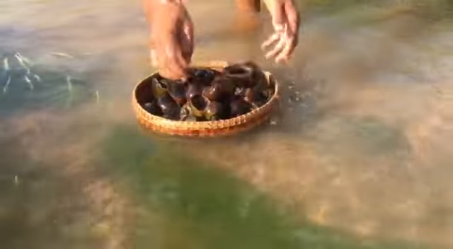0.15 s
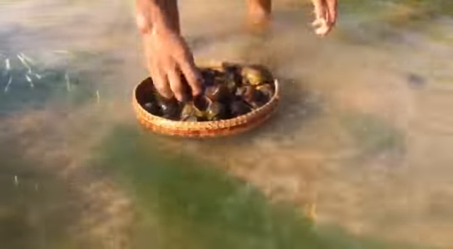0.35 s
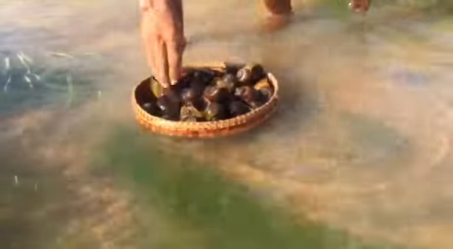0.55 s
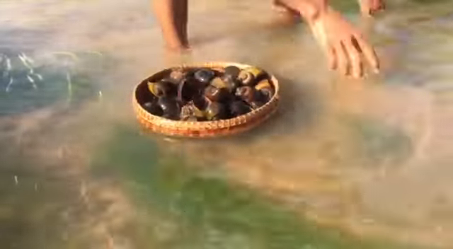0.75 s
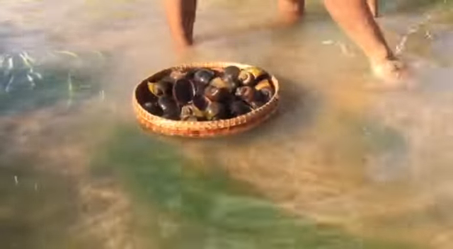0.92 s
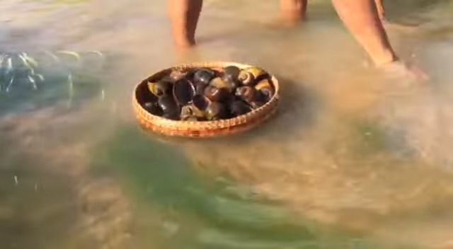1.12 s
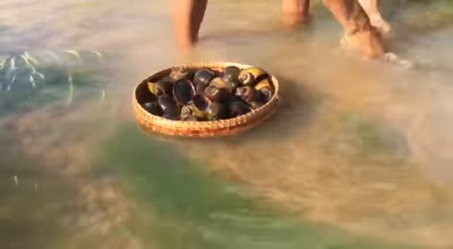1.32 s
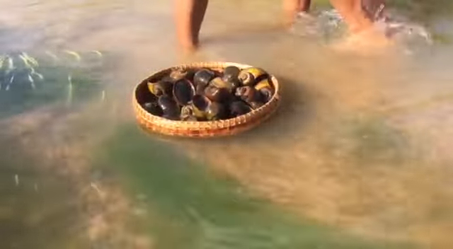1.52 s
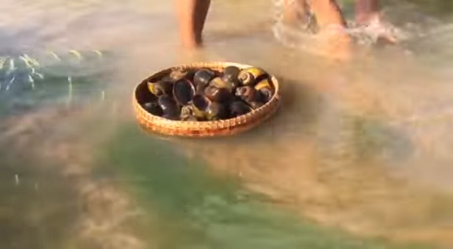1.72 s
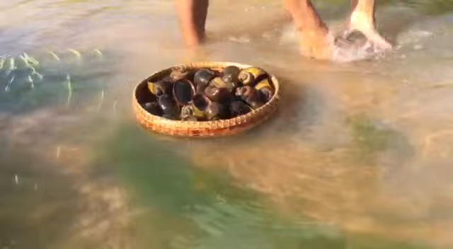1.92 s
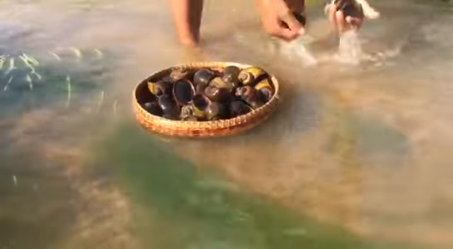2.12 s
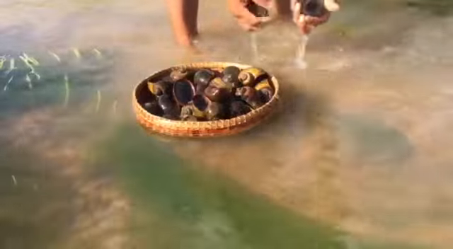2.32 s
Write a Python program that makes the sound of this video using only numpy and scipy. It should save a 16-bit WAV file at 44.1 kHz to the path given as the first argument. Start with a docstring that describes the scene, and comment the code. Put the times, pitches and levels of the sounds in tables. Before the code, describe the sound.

Hard shells knock and grind together briefly, followed by a hand dipping and sloshing through shallow water

```python
"""Snails rinsed in a shallow stream, over a low rumble, a wavering hum and a faint trickle.
First water dribbles off, then wet shells knock in a woven basket: short damped rings that rattle the heap,
with the gritty grinding of fingers shifting it. Next a hand dips in, then swishes a handful about: gliding
bubble rings, noise-burst slaps, and clouds of tiny rings for gurgle, slosh and spray. It ends in drips."""
import sys
import numpy as np
from scipy import signal
from scipy.fft import rfft, irfft
from scipy.io import wavfile

SR = 44100
rng = np.random.default_rng(int(sys.argv[2]) if len(sys.argv) > 2 else 0)


def dump(signal):
    """Clip the signal to [-1, 1] and save it as 16-bit WAV at the path in sys.argv[1]."""
    limited = np.clip(np.atleast_2d(signal).T, -1, 1)
    pcm = np.round(limited * 32767).astype(np.int16)
    wavfile.write(sys.argv[1], SR, pcm)


N = 103635  # length in samples

# Colour of the low rumble. Each row: frequency in Hz, level in dB per Hz.
RUMBLE_COLOUR = [(35, -31), (50, -12.5), (65, -4), (130, -4), (200, -20.5)]
# Colour of the stream's trickle. Each row: frequency in Hz, level in dB.
TRICKLE_COLOUR = [(150, 24), (300, 3.5), (600, -8), (2200, -10), (6000, 6.5), (9000, 0)]
# Colour of the echo from the banks. Each row: frequency in Hz, level in dB.
BANK_COLOUR = [(200, -9), (900, -2.5), (4000, -10)]
# Treble response of the microphone. Each row: frequency in Hz, gain in dB.
MIC_COLOUR = [(3000, -0.5), (4200, -1), (4900, -4.5), (5500, -1), (6500, -2), (7300, -3), (8200, 1),
              (8900, 2), (9500, -13.5)]
# Water running off the hand. Each row: time in seconds, level in dB.
DRIBBLE_CURVE = [(0, -44), (.055, -52.5), (.075, -62.5), (.135, -74), (.15, -55), (.195, -45),
                 (.215, -63.5), (.26, -74)]
# Colour of the dribble's bubbles. Each row: frequency in Hz, level in dB.
DRIBBLE_COLOUR = [(1100, -13.5), (2200, 2), (4800, -6.5), (9500, -13.5)]
# Single drops smacking the surface. Each row: start in seconds, level in dB.
DROPS = [(.143, -39.5), (.757, -41.5), (0.82, -36.5), (0.858, -30), (1.019, -35.5), (1.556, -25),
         (1.572, -30.5), (1.5977, -22), (1.669, -35), (1.727, -30), (1.7626, -27), (1.849, -21),
         (1.921, -24), (1.938, -26), (2.0491, -23.5), (2.11, -36.5), (2.139, -36), (2.173, -38),
         (2.217, -37), (2.238, -33.5), (2.274, -50.5), (2.3356, -35)]
# Colour of a drop's smack. Each row: frequency in Hz, level in dB.
DROP_COLOUR = [(1000, -13), (3000, 2.5), (5500, -3.5), (9000, -3)]
# Slaps of the hand and of falling water. Each row: start in seconds, level in dB, decay time in seconds.
SLAPS = [(0.875, -30.5, 0.043), (1.703, -29, 0.11), (1.7597, -15, 0.025), (1.8396, -25, 0.076),
         (1.9351, -28, 0.043), (2.065, -26, 0.022), (2.084, -26, 0.023)]
# Colour of a slap. Each row: frequency in Hz, level in dB.
SLAP_COLOUR = [(400, -17.5), (1600, -3), (4200, -7.5), (6500, -10), (9500, -25.5)]
# Large bubbles and drips. Each row: start in seconds, starting pitch in Hz, level in dB,
# ring time in seconds, pitch glide in octaves per second.
BUBBLES = [(.008,2050,-30.5,0.017,9), (.045,2030,-34,.014,10), (.176,1890,-43,0.031,25), (.6,597,-45,0.3,1),
           (.689,754,-39.5,0.072,8.5), (.77,1170,-30.5,0.033,0), (.795,854,-34.5,0.073,17.5),
           (.818,4130,-37,0.021,12), (.845,760,-44,0.083,1), (.877,2440,-24,0.017,-12),
           (.884,433,-27,0.039,-4.5), (.914,2050,-23.5,.022,7), (.923,820,-27,0.066,5.5),
           (0.928,3000,-27,0.02,14), (.939,3770,-23,.018,8), (.956,1444,-28,0.036,5.5),
           (.976,3900,-28,.011,2), (.998,578,-34,0.1,0.5), (1.027,3340,-23,0.0088,-20),
           (1.074,1953,-33.5,0.04,7), (1.249,860,-46.5,0.078,13.5), (1.319,1424,-33.5,0.042,14.5),
           (1.315,847,-49,0.15,4.5), (1.45,1080,-33.5,0.03,-4), (1.517,642,-37.5,.11,-3),
           (1.539,1490,-30,0.049,13), (1.557,936,-30.5,0.038,16), (1.576,982,-29,0.05,19),
           (1.6216,695,-15,0.043,37), (1.6872,950,-20.5,0.065,15.5), (1.7046,1125,-14.5,0.022,26),
           (1.705,1960,-21,0.017,20), (1.767,1805,-17,0.02,13), (1.835,2500,-22,.039,-3),
           (1.844,1376,-21.5,0.019,11), (1.848,450,-24,0.043,26), (1.926,2010,-24.5,0.031,-13),
           (1.939,2550,-23.5,0.027,16), (1.9525,828,-7.5,.014,-12), (1.964,764,-24.5,0.029,23),
           (1.974,1470,-23,0.038,22), (2.005,1020,-19.5,0.017,27), (2.045,1060,-20,0.017,11),
           (2.066,1050,-28,0.024,20), (2.121,930,-31.5,0.024,23), (2.147,1470,-30,0.022,25),
           (2.163,780,-29,0.019,39), (2.276,1210,-42.5,0.045,12), (2.29,2280,-34,.016,15),
           (2.306,994,-31.5,0.042,4.5), (2.335,1136,-32.5,.031,13)]
# The hand dipping in. Each row: time in seconds, slosh level in dB, spray level in dB.
DIP = [(.74, -81, -74), (.861, -67, -60), (0.912, -46, -30), (.933, -39.5, -36), (.954, -39, -50),
       (1.0, -53, -59), (1.04, -47, -52.5), (1.125, -70, -68.5), (1.3, -69.5, -99)]
# The hand swishing. Each row: time in seconds, slosh level in dB, spray level in dB.
SWISH = [(1.41, -58, -71), (1.48, -50, -59.5), (1.526, -55.5, -60.5), (1.555, -37, -50.5),
         (1.597, -40, -43.5), (1.655, -44, -44.5), (1.687, -30.5, -42.5), (1.73, -41.5, -44.5),
         (1.773, -33.5, -41.5), (1.815, -42, -44), (1.845, -36, -36.5), (1.9, -42.5, -43),
         (1.965, -34, -41.5), (2.031, -42, -47), (2.069, -38, -46), (2.135, -42, -44.5),
         (2.265, -59.5, -52.5), (2.35, -50.5, -60)]
# Gurgle following the depth of the hand's push. Each row: time in seconds, level in dB.
CHURN = [(.86, -82), (.89, -49), (1.07, -57), (1.12, -74.5), (1.56, -72.5), (1.77, -38.5), (1.81, -54.5),
         (1.85, -44), (1.95, -66.5), (2.11, -64.5), (2.15, -84)]
# Colour of the low gurgle. Each row: frequency in Hz, level in dB.
GURGLE_COLOUR = [(220, -20), (330, -1.5), (420, -3.5), (600, -1)]
# Colour of the slosh, bubble size by pitch. Each row: frequency in Hz, level in dB.
SLOSH_COLOUR = [(480, -25), (620, -2.5), (1200, 4), (4000, -9)]
# Colour of the fine spray. Each row: frequency in Hz, level in dB.
SPRAY_COLOUR = [(1200, -19.5), (2300, -1.5), (4000, -2.5), (6000, -3.5), (10000, -10.5)]
# Colour of flung droplets landing. Each row: frequency in Hz, level in dB.
SPATTER_COLOUR = [(1500, -6.5), (3000, -4.5), (6000, -7), (9500, -6)]
# Fingers shifting the heap. Each row: time in seconds, level in dB.
RUMMAGE_CURVE = [(.24, -64), (.255, -45), (.34, -56), (.375, -62), (.395, -33.5), (.47, -65), (.505, -51.5),
                 (.625, -43), (.73, -63), (.77, -45.5), (.86, -83)]
# Colour of the tiny shell contacts. Each row: frequency in Hz, level in dB.
GRIT_COLOUR = [(200, -6), (2800, 1.5), (5000, -14.5), (6200, -11.5), (9500, -13.5)]
# Shell knocks. Each row: start in seconds, shell pitch in Hz, ring level in dB, contact tick level in dB,
# ring time in seconds, pitch of the shell's hollow in Hz, hollow level in dB.
KNOCKS = [(.2236, 1610, -7.5, -14.5, 0.0055, 6080, -20.5), (.2397, 1700, -14.5, -24, 0.0099, 2760, -34),
          (.2425, 1100, -1, -38, 0.0049, 1750, -30), (.2450, 2140, -3.5, -31.5, 0.0059, 2776, -25.5),
          (0.25, 1250, -19, -59, .0073, 1010, -33), (.2565, 2080, -21, -46, 0.0063, 1460, -28),
          (0.2597, 1130, -20, -49, .008, 2010, -33), (.2985, 1240, 0.5, -29.5, 0.0028, 1520, -22),
          (0.3135, 1430, -18.5, -52, 0.005, 2270, -28), (0.3778, 3030, -48, -33, 0.0094, 6020, -45),
          (.3910, 860, -24.5, -30, 0.0057, 2760, -29.5), (.4089, 1220, -20.5, -30.5, 0.0088, 2250, -26),
          (0.4441, 1000, -25.5, -41.5, 0.0048, 2440, -42), (0.491, 1200, -6.5, -37.5, 0.0052, 1870, -24.5),
          (0.5255, 890, -18, -58, 0.003, 1150, -34), (0.54, 1380, -21.5, -49, 0.0066, 2620, -37),
          (0.5704, 1140, -25, -60, 0.007, 1700, -31), (0.5925, 1450, -16, -47, 0.0039, 1060, -41),
          (.6060, 1610, -17, -45, 0.0042, 2840, -35), (0.6204, 2360, -23, -35, 0.0042, 3740, -28),
          (0.631, 2590, -13.5, -29.5, 0.0044, 2474, -15.5), (.6875, 1050, -26.5, -49, 0.0037, 2630, -42),
          (.764, 2260, -20, -37.5, .0057, 2710, -37), (1.0625, 1430, -20.5, -39, 0.003, 1780, -39)]
# Partials of the shell wall. Each row: ratio to the pitch, level in dB, share of the ring time as a ratio.
SHELL_PARTIALS = [(0.619, -7.5, 0.81), (1.0, 6, 0.62), (1.519, -13, 0.79)]
# Colour of the contact tick. Each row: frequency in Hz, level in dB.
TICK_COLOUR = [(300, 12.5), (1500, 5), (3000, 2.5), (4500, -1), (6000, 5), (7200, -2.5), (8500, -3.5),
               (10000, 2.5)]
# Colour of the rattle of heap and basket. Each row: frequency in Hz, level in dB.
HEAP_COLOUR = [(150, -8), (300, -1), (650, -1), (1100, -3), (4000, 0.5), (6000, -4.5)]


def undb(db):
    """Decibels to gain."""
    return 10 ** (np.asarray(db) / 20)


def unit(x):
    """Scale to rms 1."""
    return x / np.sqrt(np.mean(x ** 2))


def add(out, start, x):
    """Mix x into out from a time in seconds."""
    i = max(int(start * SR), 0)
    out[i:i + len(x)] += x[:max(len(out) - i, 0)]


def gain_at(points, hz):
    """Gain of (Hz, dB) points on a log-frequency axis."""
    f, db = np.array(points, float).T
    return undb(np.interp(np.log(np.maximum(hz, 1)), np.log(f), db))


def noise(points):
    """Noise of rms 1 with the given colour."""
    spectrum = rfft(rng.standard_normal(N))
    return unit(irfft(spectrum * gain_at(points, np.fft.rfftfreq(N, 1 / SR)), N))


def swell(curve):
    """Gain over time from (s, dB) points."""
    s, db = np.array(curve).T
    return undb(np.interp(np.arange(N) / SR, s, db))


def butter(x, order, hz, kind):
    """Butterworth filter, kind "low" or "high"."""
    return signal.sosfilt(signal.butter(order, hz, kind, fs=SR, output="sos"), x)


def fade(t60, hold=1):
    """Decay to -60 dB in t60 seconds; exponential at hold 1, above it the level holds, then dies faster."""
    t = np.arange(min(int(t60 * SR) + 2, N)) / SR
    return np.exp(-np.log(1000) * (t / t60) ** hold)


def ring(hz, t60, onset, rise=0, hold=1):
    """A damped sine that swells over the onset time and glides by rise octaves per second."""
    env = fade(t60, hold)
    t = np.arange(len(env)) / SR
    phase = 2 * np.pi * np.cumsum(hz * 2 ** (rise * t)) / SR
    attack = 1 - np.exp(-(t / onset) ** 2)
    return np.sin(phase) * env * attack


def scatter(x, source, t60):
    """Smear x with a decaying noise tail of unit energy."""
    env = fade(t60)
    tail = source[:len(env)] * env
    return signal.fftconvolve(x, tail / np.linalg.norm(tail))[:N]


def tint(x, points):
    """Colour x by (Hz, dB) points, causally (minimum phase)."""
    cepstrum = irfft(np.log(gain_at(points, np.fft.rfftfreq(1024, 1 / SR))))
    folded = np.r_[cepstrum[0], 2 * cepstrum[1:len(cepstrum) // 2]]
    impulse = irfft(np.exp(rfft(folded, len(cepstrum))))
    return signal.fftconvolve(x, impulse)[:N]


def cloud(colour, per_s, cycles, spread_db, rise_oct):
    """A steady stream of tiny rings of random pitch, level and length, each gliding rise_oct octaves; rms 1."""
    out = np.zeros(N)
    lo, hi = colour[0][0], colour[-1][0]
    draws = rng.random((12000, 4))
    for k, (when, pitch, size, length) in enumerate(draws[:int(per_s * N / SR)]):
        hz = lo * (hi / lo) ** pitch
        t60 = cycles * (.5 + length) / hz
        # mostly small grains, with a capped tail of louder ones
        db = spread_db * min(-np.log(1 - size), np.pi)
        level = undb(db) * gain_at(colour, hz) * np.sqrt(hz / hi)
        add(out, (k + when) / per_s, level * ring(hz, t60, .5 / hz, rise_oct / t60))
    return unit(butter(out, 4, lo, "high"))


def background():
    """Low-passed noise as rumble, a sine hum of wavering level, and coloured noise as the stream's trickle."""
    t = np.arange(N) / SR
    rumble = unit(butter(noise(RUMBLE_COLOUR), 4, 185.6, "low"))
    waver = noise([(3, 0), (30, -60), (300, -140)])  # slow: mostly a few Hz
    hum = np.sin(2 * np.pi * 117 * t) * (1 + 0.13 * waver)
    return undb(-47.5) * rumble + undb(-56) * hum + undb(-66) * noise(TRICKLE_COLOUR)


def dribble():
    """Water runs off the handful onto the wet heap in tiny high bubbles."""
    return swell(DRIBBLE_CURVE) * cloud(DRIBBLE_COLOUR, per_s=1200, cycles=32, spread_db=0, rise_oct=0.14)


def drops():
    """Falling drops give brief bright smacks."""
    out, smack = np.zeros(N), noise(DROP_COLOUR)
    env = fade(0.0082)
    for s, db in DROPS:
        burst = np.roll(smack, -int(s * SR))[:len(env)]
        add(out, s, undb(db) * env * burst)
    return out


def slaps():
    """Water hit flat gives a short broad burst."""
    out, burst = np.zeros(N), noise(SLAP_COLOUR)
    onset_s = 0.0011
    for s, db, t60 in SLAPS:
        env = fade(t60)
        attack = 1 - np.exp(-np.arange(len(env)) / SR / onset_s)
        add(out, s, undb(db) * env * attack * burst[int(s * SR):][:len(env)])
    return out


def bubbles():
    """Large air pockets ring, most of them rising in pitch as they near the surface."""
    out = np.zeros(N)
    onset_cycles = 1.79
    for s, hz, db, t60, rise in BUBBLES:
        add(out, s, undb(db) * ring(hz, t60, onset_cycles / hz, rise, hold=1.05))
    return out


def spurts():
    """The water breaks up in short uneven spurts: a gain that wanders quickly at random."""
    knots = rng.standard_normal(2000)
    position = np.arange(N) / SR * 130  # knots per second
    return undb(3 * np.interp(position, np.arange(len(knots)), knots))


def stirred_water():
    """The hand drives a low gurgle, a slosh of mid-sized bubbles, fine spray and a sparse spatter of droplets."""
    stir = np.array(DIP + SWISH)
    gurgle = cloud(GURGLE_COLOUR, per_s=350, cycles=18, spread_db=3.5, rise_oct=0.48)
    slosh = cloud(SLOSH_COLOUR, per_s=900, cycles=26.4, spread_db=4.5, rise_oct=0.49)
    spray = cloud(SPRAY_COLOUR, per_s=2600, cycles=16, spread_db=1, rise_oct=0.1)
    spatter = cloud(SPATTER_COLOUR, per_s=170, cycles=7, spread_db=5, rise_oct=0)
    droplets = unit(spray + undb(-7) * spatter)
    broken = slosh * swell(stir[:, [0, 1]]) + droplets * swell(stir[:, [0, 2]])
    return gurgle * swell(CHURN) + spurts() * broken


def rummage():
    """Shells grind on each other in many tiny dry contacts."""
    return swell(RUMMAGE_CURVE) * cloud(GRIT_COLOUR, per_s=1800, cycles=10.3, spread_db=0.5, rise_oct=0)


def shells():
    """A contact tick, a few cycles of shell wall and a ring of the hollow; each knock rattles the heap anew."""
    out, tick, heap = np.zeros(N), noise(TICK_COLOUR), noise(HEAP_COLOUR)
    contact_s, hollow_t60_s = 0.00029, 0.021
    tick_env = fade(0.022)
    for s, hz, ring_db, tick_db, t60, hollow_hz, hollow_db in KNOCKS:
        i = int(s * SR)  # a fresh stretch of noise for each knock
        knock = np.zeros(N // 20)
        for ratio, db, share in SHELL_PARTIALS:
            add(knock, 0, undb(ring_db + db) * ring(hz * ratio, t60 * share, contact_s))
        add(knock, 0, undb(tick_db) * tick_env * tick[i:][:len(tick_env)])
        add(out, s, knock)
        add(out, s, undb(hollow_db) * ring(hollow_hz, hollow_t60_s, contact_s))
        add(out, s, undb(-6.5) * scatter(knock, heap[i:], t60=0.033))
    return out


def scene():
    """Shells and water close by, with a weak echo from the banks."""
    # small shells radiate little low end
    basket = butter(shells() + rummage(), 3, 314, "high")
    near = basket + dribble() + bubbles() + slaps() + drops() + stirred_water()
    echo = undb(-16.5) * scatter(near, noise(BANK_COLOUR), t60=0.12)
    return (near + echo + background())[None]


def record(dry):
    """The microphone colours the treble and the recorder cuts the top."""
    top_cut = signal.ellip(10, .2, 80, 9400, fs=SR, output="sos")  # low-pass at 9400 Hz
    return signal.sosfilt(top_cut, tint(dry[0], MIC_COLOUR))[None]


dry = scene()
out = record(dry)
dump(out)
```